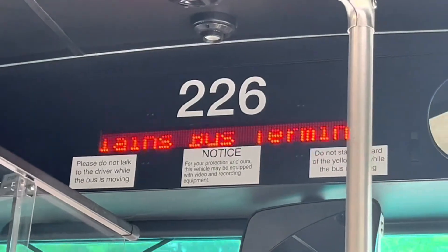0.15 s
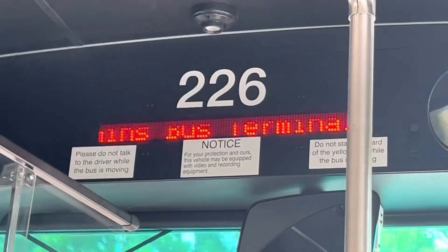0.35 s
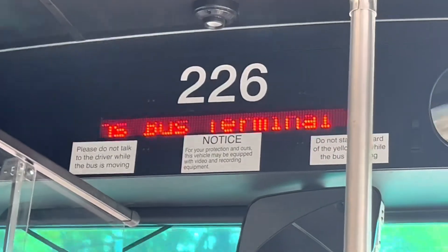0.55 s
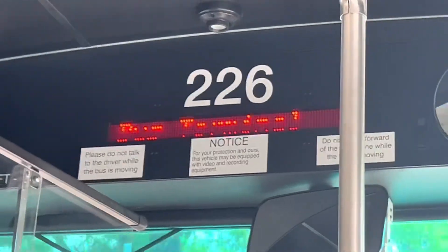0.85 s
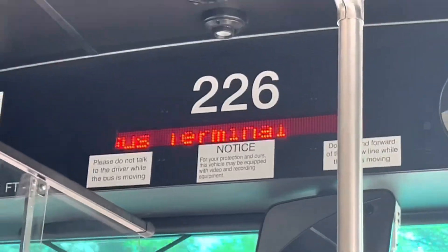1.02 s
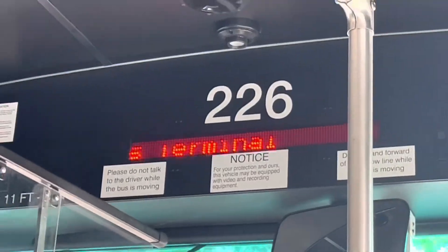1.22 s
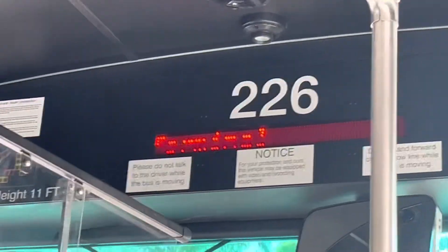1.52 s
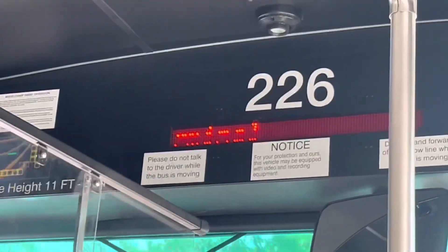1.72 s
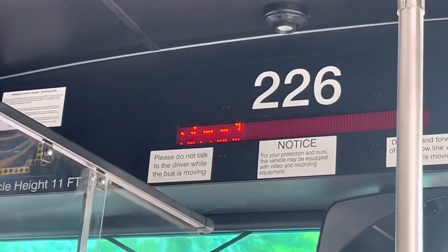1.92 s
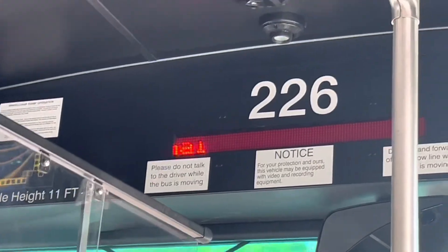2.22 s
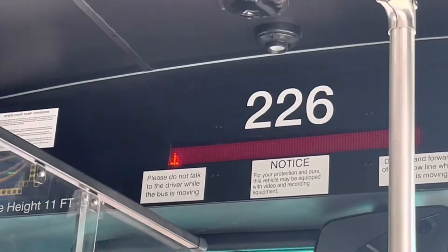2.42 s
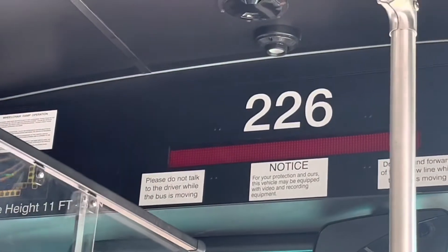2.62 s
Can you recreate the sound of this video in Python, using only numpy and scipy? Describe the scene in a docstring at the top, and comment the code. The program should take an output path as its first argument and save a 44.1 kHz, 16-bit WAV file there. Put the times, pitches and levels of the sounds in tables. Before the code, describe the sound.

A city bus in motion, heard inside the cabin on a handheld phone. Deep road rumble, swelling boom, dull air and tyre roar and a faint steady gear whine continue throughout, with tiny bright metal ticks. From about 1.2 s trim shakes; low thumps land around 1.4 to 1.8 s with dense rattling and brief panel squeaks. Sharp ringing clinks follow near 1.8 and 2.2 s, then fade.

```python
"""Inside a moving city bus: filtered noise makes road rumble, a one-pitch cabin boom and a roar of air and tyres.
A wavering sine is the faint gear whine; bright hiss ticks and clinks of a loose metal fitting dot the ride.
From about 1.2 s a bump thumps the body in low decaying sines, trim rattles in dense contacts, a panel squeaks.
Strong clinks follow near 1.8 and 2.2 s, their metal ringing on as narrow bands of noise.
A phone with two microphone ports listens throughout; the treble reaches the ports out of step."""
import sys
import numpy as np
from scipy import signal
from scipy.fft import rfft, irfft
from scipy.io import wavfile
from scipy.ndimage import uniform_filter1d

SR = 44100
rng = np.random.default_rng(int(sys.argv[2]) if len(sys.argv) > 2 else 0)


def int16_out(signal):
    """Quantize to a 16-bit WAV file."""
    q = np.round(np.clip(np.atleast_2d(signal).T, -1, 1) * 32767)
    wavfile.write(sys.argv[1], SR, q.astype(np.int16))


N = 121275
T = np.arange(N) / SR  # s
F = np.maximum(np.fft.rfftfreq(N, 1 / SR), 1)  # Hz

# Road rumble through the floor, before its trim: t/s, level/dB
ROAD_LEVEL = [(0.0, -20.5), (0.23, -19.5), (0.24, -17), (0.5, -22), (0.57, -17.5), (0.67, -22), (0.83, -19),
              (0.88, -22.5), (1.37, -18.5), (1.41, -14), (1.47, -17.5), (1.6, -17.5), (1.7, -18),
              (1.93, -20.5), (2.13, -18.5), (2.42, -21), (2.63, -18), (2.69, -23), (2.75, -18)]
# Its colour: f/Hz, gain/dB
ROAD_COLOUR = [(12, -52), (20, -16), (45, -4.5), (64, 1), (178, -10.5), (221, -24), (240, -20.5),
               (310, -66), (530, -120)]
# Boom of the cabin, before its trim: t/s, level/dB
BOOM_LEVEL = [(0.0, -22), (0.45, -32), (0.47, -39), (0.55, -12), (0.7, -33), (0.84, -12.5), (0.99, -38),
              (1.15, -17.5), (1.36, -25), (1.4, -34), (1.67, -25), (1.71, -40), (2.17, -10), (2.23, -35),
              (2.33, -15), (2.38, -27.5), (2.59, -12), (2.75, -40)]
BOOM_HZ, BOOM_WIDTH_HZ = 60.2, 4
ROAD_TRIM_DB, BOOM_TRIM_DB = -1.5, -3.0

# Thumps of the body, peak level before the envelope: t/s, f/Hz, level/dB, t60/s
THUMPS = [(1.001, 111.7, -14, 0.34), (1.391, 140, -13, 0.25), (1.421, 74, -5, 0.15), (1.492, 55, -9, 0.15),
          (1.503, 140.3, -14, .3), (1.507, 73.4, -15, 0.28), (1.535, 69.5, -14, 0.099),
          (1.567, 49, -11, 0.16), (1.65, 75, -8, 0.19), (1.786, 62, -9, .15), (2.126, 61, -26, 0.3),
          (2.191, 105, -11.5, 0.26)]
THUMP_ATTACK_S = 0.0034

# Trim shaking, before its trim: t/s, level/dB
SHAKE_LEVEL = [(0.0, -33), (0.01, -52), (1.14, -47), (1.21, -34), (1.24, -44), (1.5, -27.5), (1.52, -33),
               (1.57, -31), (1.58, -36), (1.66, -33), (1.78, -41), (1.82, -35.5), (1.89, -44),
               (2.16, -41.5), (2.25, -36.5), (2.33, -38.5), (2.73, -49.5), (2.75, -54)]
# Its colour: f/Hz, gain/dB
SHAKE_COLOUR = [(500, -10), (1000, 12), (1600, 0.5), (1850, 7.5), (2300, 1.5), (3200, 0.5), (5000, -4),
                (7000, -10.5), (9000, -11), (11000, -16), (15500, -26)]
SHAKE_TRIM_DB, SHAKE_SPREAD_DB = 0.5, 3.5
SHAKE_RATE = 1500  # mean contacts a second in each of two streams
SHAKE_DECAY_S = 0.0079  # time constant of one contact

# Clinks: t/s, rattle level/dB, ring level/dB, pole against ring/dB, panel against ring/dB, rattle t60/s
CLINKS = [(.66, -44, -50, -12, -12, .3), (.68, -43, -53.5, -6, 6.5, 0.18), (1.18, -45, -65, 0, 0, 0.14),
          (1.205, -46, -66, -2, -2, .15), (1.275, -52, -61, 0, -1, .3), (1.462, -45, -63, 0, 18, .3),
          (1.475, -35, -36, -8, -1, 0.32), (1.545, -56, -60, 3, 8, .3), (1.64, -61, -63, 0, 2, .3),
          (1.805, -35, -29.5, -4, -17, 0.31), (2.234, -32, -32.5, -13, -20, 0.36)]
# Colour of the rattle: f/Hz, gain/dB
CLINK_COLOUR = [(2000, -5), (4000, -3), (6300, -2), (7500, -4), (8800, -3), (10000, -1), (11200, -14),
                (15000, -14)]
CLINK_ATTACK_S, RING_ATTACK_S = 0.01, 0.006
# Ringing modes of the fitting: f/Hz, width/Hz, level/dB, t60/s
FITTING_MODES = [(8562, 130, -6, .25), (8988, 200, -7, .25), (9400, 250, -8, .25), (9957, 300, 1, .13),
                 (10400, 300, -5, .15), (11104, 40, -13, .15)]
# Ringing modes of the pole: f/Hz, width/Hz, level/dB, t60/s
POLE_MODES = [(3700, 70, -9, .3), (4045, 40, -13, .3), (4230, 40, -12, .3), (6028, 100, 0, .17),
              (6656, 50, -10, .25)]
# Ringing modes of the panel: f/Hz, width/Hz, level/dB, t60/s
PANEL_MODES = [(3181, 160, -4, .2), (4738, 60, -8, .25), (5240, 70, -6, .25), (5422, 60, -3, .25)]

# Ticks of the fitting: t/s, level/dB, top end against it/dB, rise/s
TICKS = [(.038, -55.5, 0, .006), (.25, -55, 0, .006), (.365, -58, 0, .006), (.655, -49, -4, .008),
         (.964, -58, 0, .006), (1.11, -50, 0, .006), (1.195, -62, 0, .006), (1.348, -44, 0, .006),
         (1.46, -41, -6, .005), (1.47, -35, 0, 0.0037), (1.642, -58, -4, .006), (1.752, -35.5, 5, 0.0033),
         (1.801, -43, 8, .003), (2.022, -52, 0, .006), (2.075, -48, -4, .006), (2.192, -32, 4.5, 0.0025),
         (2.24, -41, 2, 0.0034), (2.381, -49, 0, .006), (2.473, -52, 0, .006), (2.558, -51, 0, .006),
         (2.709, -48, 3, .004)]
# Their colour: f/Hz, gain/dB
TICK_COLOUR = [(3000, -34), (5500, -12), (7000, 0.5), (9000, 2), (10200, 3), (11200, -7), (13300, -4.5),
               (15500, -11)]
TICK_SPLIT_HZ, TICK_T60_S = 11200, 0.25
CRACK_DB, CRACK_T60_S = -2, 0.029  # crack against the top end

# Squeaks of panels: t/s, f/Hz, level/dB, length/s
SQUEAKS = [(1.272, 1805, -36, .018), (1.275, 2320, -41, .025), (1.295, 1815, -41, .045),
           (1.355, 1875, -29, .024), (1.379, 1870, -29, .02), (1.397, 1845, -33, .024),
           (1.425, 1850, -40, .02), (1.446, 1845, -30, .018), (1.465, 1860, -34, .012),
           (1.465, 3180, -39, .047), (1.474, 1812, -28.5, .044), (1.516, 1805, -36, .02),
           (1.536, 1830, -37, .03), (1.567, 3180, -41, .014), (1.57, 1805, -39, .02)]
SQUEAK_ROUGH_DB = 0.8
SQUEAK_WAVER = 0.002  # share of the pitch

# Roar of air and tyres, before its trim: t/s, level/dB
ROAR_LEVEL = [(0.0, -27), (0.01, -27), (1.22, -27), (1.25, -27), (1.28, -23), (1.86, -27.5), (2.72, -26.5),
              (2.75, -26)]
# Its colour: f/Hz, gain/dB
ROAR_COLOUR = [(170, 1), (230, 0), (400, 0.5), (600, -2.5), (900, -9), (1500, -13.5), (1850, -15.5),
               (2400, -21.5), (4000, -28), (6500, -35), (9000, -43), (12000, -46), (15500, -55)]
# Cabin resonances on the roar: f/Hz, width/Hz, boost/dB
RESONANCES = [(307, 25.4, 5.34), (351, 12.5, 5.2), (432, 11, 6.4), (571.6, 21, 4), (671, 14, 1.1),
              (1440, 15, 1.9), (1712, 29, 4.9), (1798, 34, 6), (2005, 45, 6)]
ROAR_TRIM_DB, ROAR_FLICKER_DB = 0.62, 1.17

# Gear whine before its waver: t/s, f/Hz
WHINE_PITCH = [(0, 260.7), (1.0, 260.4), (2.1, 261.3), (2.75, 260.3)]
WHINE_DB, WHINE_WOBBLE_DB, WHINE_WAVER_HZ = -35, 2, 0.77

# Likeness of the noise at the two ports: f/Hz, correlation (0-1)
LIKENESS = [(20, 1), (60, 1), (130, .97), (290, .65), (630, .68), (1250, .1), (1800, .55), (2600, .9),
            (3300, 1), (5000, 1), (7000, .8), (8300, 1), (10000, .85), (11100, 1), (12700, 1), (13700, .8),
            (14600, 1)]
# Left port against right: f/Hz, level/dB
BALANCE_DB = [(60, -1.5), (200, -2), (370, 0), (690, 0), (1200, -2), (1800, -7), (2300, -3.5), (3200, 0),
              (16000, 0)]
# Phase by which the left port leads: f/Hz, phase/rad
LEAD = [(20, 0), (1200, 0), (2000, .35), (2800, .3), (3500, 0), (5000, 0), (5900, -.7), (6900, -1.3),
        (7850, -np.pi), (8650, -np.pi), (10000, -4.7), (11150, -2 * np.pi), (12500, -2 * np.pi),
        (13500, -7.2), (14750, -3 * np.pi), (16000, -3 * np.pi)]
TOP_HZ = 15710


def undb(db):
    """Turns dB into gain."""
    return 10 ** (np.asarray(db) / 20)


def curve(rows):
    """Draws a time table as a straight-line automation, one value per sample."""
    return np.interp(T, *np.array(rows).T)


def over_f(rows):
    """Draws a frequency table over log frequency, one value per bin."""
    hz, v = np.array(rows).T
    return np.interp(np.log(F), np.log(hz), v, left=v[0], right=v[-1])


def unit(x):
    """Scales to rms 1."""
    return x / np.sqrt(np.mean(x ** 2))


def walk(rate):
    """Smooth random drift of rms 1, drawing a new value about `rate` times a second."""
    k = int(SR / rate)
    steps = np.repeat(rng.standard_normal(N // k + 1), k)
    smooth = uniform_filter1d(uniform_filter1d(steps, k), k)
    return unit(smooth[:N])


def diffuse(gain, source=None):
    """Two-port noise of rms 1, alike by LIKENESS, through a gain per bin."""
    a, b = rfft(rng.standard_normal((2, N)) if source is None else source)
    c = np.clip(over_f(LIKENESS), 0, 1)
    mid, side = a * np.sqrt(1 + c), b * np.sqrt(1 - c)
    return unit(irfft(np.array([mid + side, mid - side]) * gain, N))


def colour(rows):
    """EQ gain per bin that falls away steeply outside the table."""
    lo, hi = rows[0][0], rows[-1][0]
    return undb(over_f(rows)) * np.minimum(F / lo, 1) ** 3 * np.minimum(hi / F, 1) ** 3


def bell(hz, width):
    """Resonance curve, 1 at its centre and half at the edges of its width."""
    return 1 / (1 + (2 * (F - hz) / width) ** 2)


def strike(start, attack, t60):
    """Envelope of a blow: short rise, exponential fall by 60 dB in t60."""
    t = np.maximum(T - start, 0)
    return (1 - np.exp(-t / attack)) * np.exp(-np.log(1000) * t / t60)


def steadier(x, slack):
    """Evens out the level of a noisy band; small slack = steady."""
    x = unit(x)
    envelope = np.abs(signal.hilbert(np.atleast_2d(x).mean(axis=0)))
    return unit(x / (slack + uniform_filter1d(envelope, size=200)))


def road_rumble():
    """Road noise under the floor: low coloured noise riding its level curve."""
    noise = steadier(diffuse(colour(ROAD_COLOUR)), 6.1)
    return noise * undb(curve(ROAD_LEVEL) + ROAD_TRIM_DB)


def cabin_boom():
    """The cabin resonates at one pitch: a narrow, steadied band of noise that swells and fades."""
    band = steadier(diffuse(bell(BOOM_HZ, BOOM_WIDTH_HZ)), 0.22)
    return band * undb(curve(BOOM_LEVEL) + BOOM_TRIM_DB)


def thumps():
    """The struck body sounds as low sines with a short rise and exponential decay."""
    return sum(undb(db) * np.sin(2 * np.pi * hz * (T - start)) * strike(start, THUMP_ATTACK_S, t60)
               for start, hz, db, t60 in THUMPS)


def shake():
    """Dense small contacts of trim and windows, each smeared into a short noise tail."""
    hits = rng.standard_normal((2, N)) * (rng.random((2, N)) < SHAKE_RATE / SR)
    hits = hits * undb(SHAKE_SPREAD_DB * np.minimum(rng.exponential(size=(2, N)), 3))
    tail = rng.standard_normal(2000) * np.exp(-T[:2000] / SHAKE_DECAY_S)
    smear = signal.fftconvolve(hits, tail[None])[:, :N]
    # flatten the broad spectrum first, so the colour table sets the tone
    spectrum = np.sqrt(uniform_filter1d(np.abs(rfft(smear[0])) ** 2, size=800))
    rattle = diffuse(colour(SHAKE_COLOUR) / spectrum, smear)
    return rattle * undb(curve(SHAKE_LEVEL) + SHAKE_TRIM_DB)


def clink_rattle():
    """The loose fitting rattles on after each clink: flickering bright noise under decaying envelopes."""
    envelope = sum(undb(db) * strike(start, CLINK_ATTACK_S, t60) for start, db, _, _, _, t60 in CLINKS)
    return diffuse(colour(CLINK_COLOUR)) * envelope * undb(1.6 * walk(70))


def clink_ring():
    """Clinks excite modes of fitting, pole and panel: narrow noise bands that each decay in their own time."""
    chatter = rfft(rng.standard_normal(N))
    out = 0
    for part, modes in enumerate((FITTING_MODES, POLE_MODES, PANEL_MODES)):
        for hz, width, db, t60 in modes:
            ring = steadier(irfft(chatter / (1 + 2j * (F - hz) / width) ** 2, N), 1)
            envelope = sum(undb(ring_db + (0, pole_db, panel_db)[part]) * strike(start, RING_ATTACK_S, t60)
                           for start, _, ring_db, pole_db, panel_db, _ in CLINKS)
            out = out + ring * undb(db) * envelope
    return out


def ticks():
    """Bright ticks of the fitting: the top end cracks first, the body of the hiss swells after it."""
    top = 1 / (1 + (TICK_SPLIT_HZ / F) ** 12)  # crossover
    hiss = rfft(diffuse(colour(TICK_COLOUR)))
    body, crack = 0, 0
    for start, db, top_db, rise in TICKS:
        body = body + undb(db) * strike(start, rise, TICK_T60_S)
        snap = undb(CRACK_DB) * strike(start, rise / 10, CRACK_T60_S)
        crack = crack + undb(db + top_db) * (strike(start, rise / 2, TICK_T60_S) + snap)
    return irfft(hiss * (1 - top), N) * body + irfft(hiss * top, N) * crack


def squeaks():
    """Rubbing panels squeak in short sine bursts, slightly rough in level and wavering in pitch."""
    rough = undb(SQUEAK_ROUGH_DB * walk(120))
    time_shift = np.cumsum(walk(150)) / SR * SQUEAK_WAVER
    bursts = 0
    for start, hz, db, length in SQUEAKS:
        arch = np.abs(np.sin(np.pi * np.clip((T - start) / length, 0, 1))) ** 0.77
        bursts = bursts + undb(db) * np.sin(2 * np.pi * hz * (T + time_shift)) * arch
    return np.sqrt(2) * rough * bursts


def roar():
    """Air and tyres: broad noise through cabin resonances; every octave flickers a little on its own."""
    boost_db = sum(db * bell(hz, width) for hz, width, db in RESONANCES)
    whole = rfft(diffuse(colour(ROAR_COLOUR) * undb(boost_db)))
    out = 0
    for k in range(7, 15):  # octave bands centred on 2**k Hz, crossfading into their neighbours
        share = np.clip(1 - np.abs(np.log2(F) - k), 0, 1)
        out = out + irfft(whole * share, N) * undb(ROAR_FLICKER_DB * walk(9.07))
    return out * undb(curve(ROAR_LEVEL) + ROAR_TRIM_DB)


def whine():
    """A thin gear tone: one sine that wavers in pitch and level."""
    hz = curve(WHINE_PITCH) + WHINE_WAVER_HZ * walk(5.94)
    phase = 2 * np.pi * np.cumsum(hz) / SR
    return np.sqrt(2) * np.sin(phase) * undb(WHINE_DB + WHINE_WOBBLE_DB * walk(7.27))


def scene():
    """Mixes all the sources at the two ports."""
    body = road_rumble() + cabin_boom() + thumps()
    loose_parts = shake() + clink_rattle() + clink_ring() + ticks() + squeaks()
    return body + loose_parts + roar() + whine()


def record(dry):
    """The ports differ in level and phase, half the difference on each; a steep low-pass cuts the top."""
    half = undb(over_f(BALANCE_DB) / 2) * np.exp(.5j * over_f(LEAD))
    ports = irfft(rfft(dry) * np.array([half, 1 / half]), N)
    low_pass = signal.ellip(12, .2, 70, TOP_HZ, fs=SR, output="sos")
    return signal.sosfilt(low_pass, ports)


dry = scene()
out = record(dry)
int16_out(out)
```